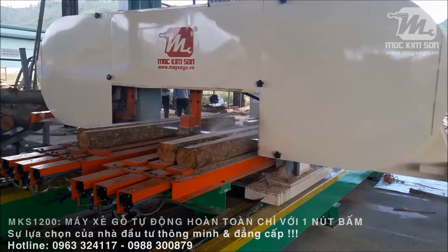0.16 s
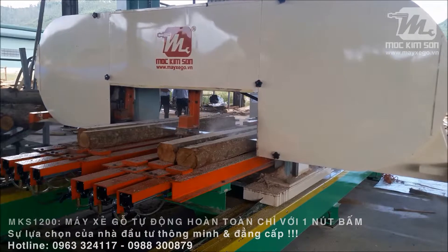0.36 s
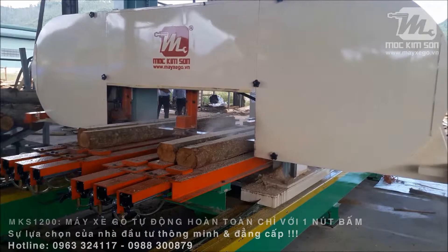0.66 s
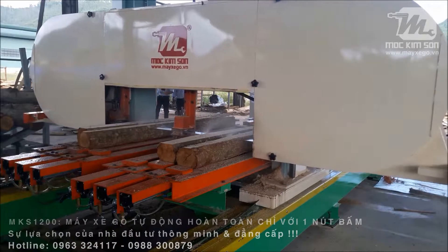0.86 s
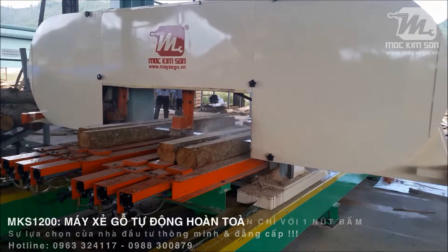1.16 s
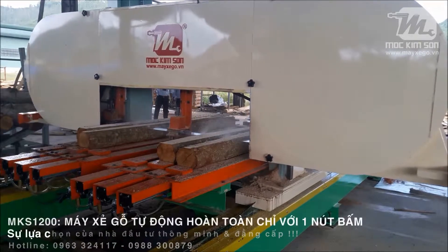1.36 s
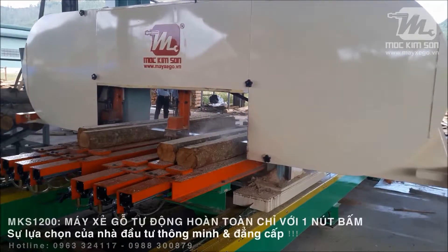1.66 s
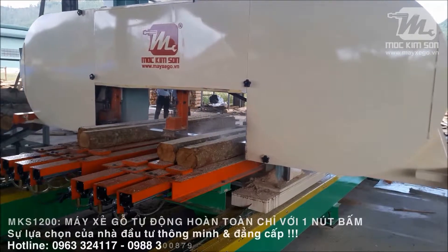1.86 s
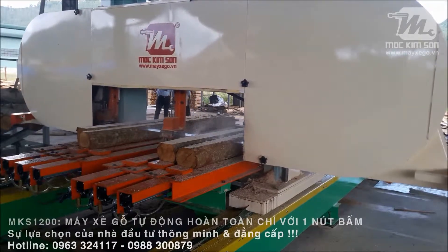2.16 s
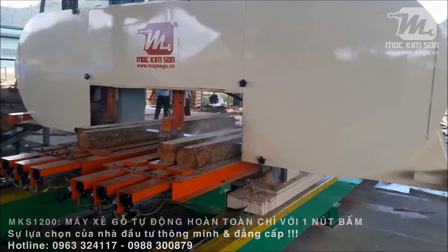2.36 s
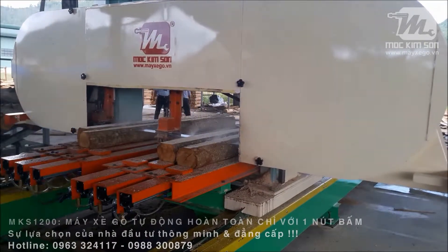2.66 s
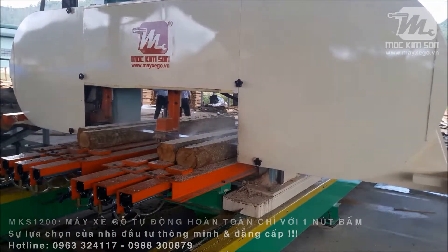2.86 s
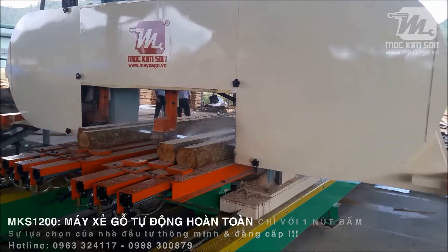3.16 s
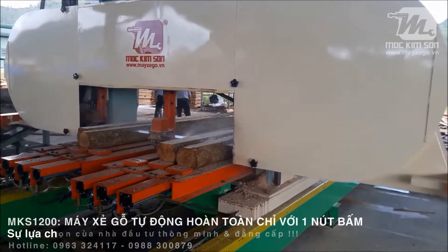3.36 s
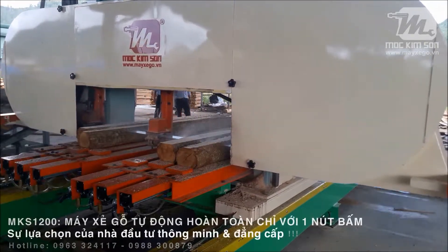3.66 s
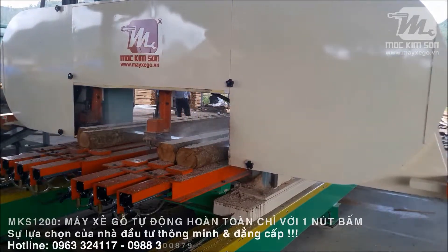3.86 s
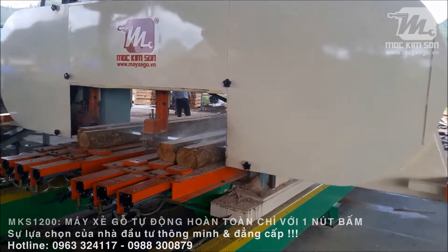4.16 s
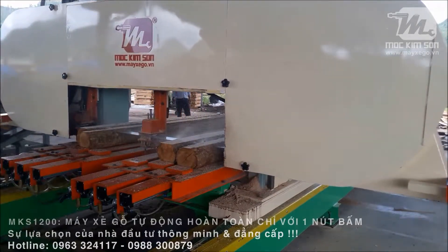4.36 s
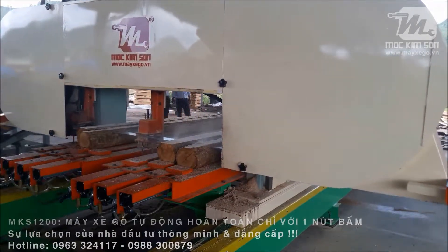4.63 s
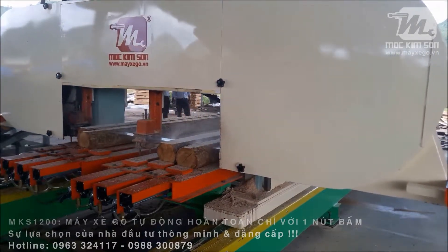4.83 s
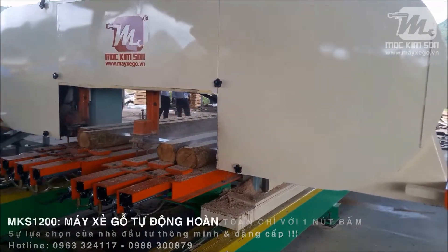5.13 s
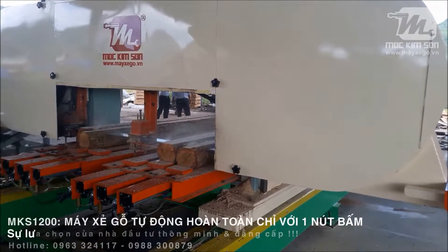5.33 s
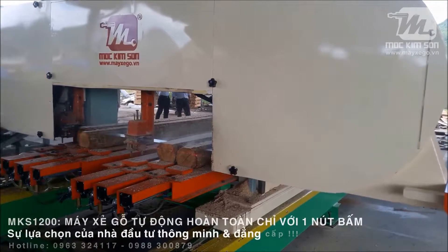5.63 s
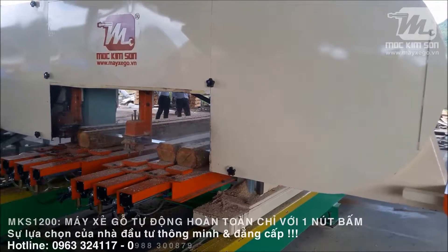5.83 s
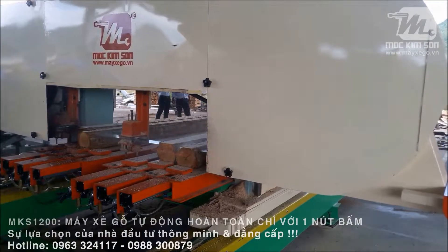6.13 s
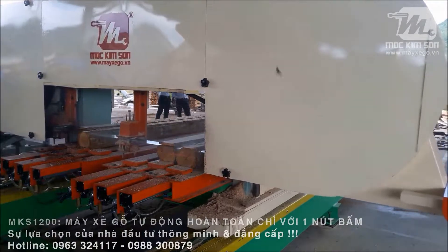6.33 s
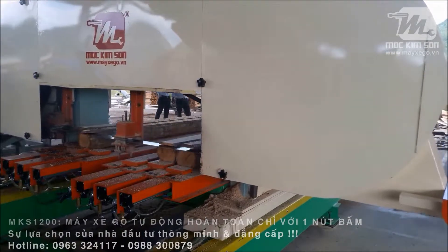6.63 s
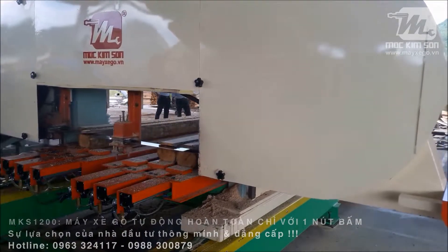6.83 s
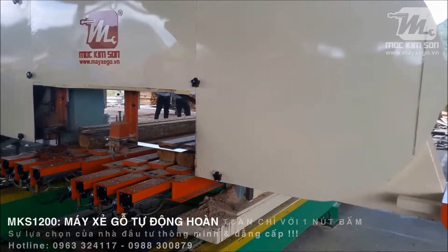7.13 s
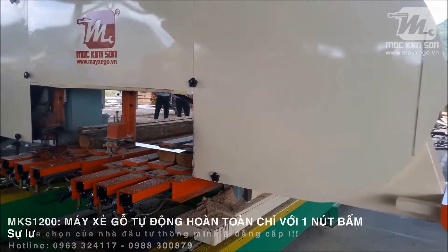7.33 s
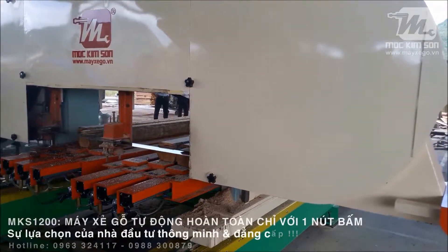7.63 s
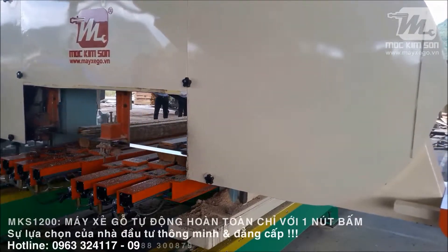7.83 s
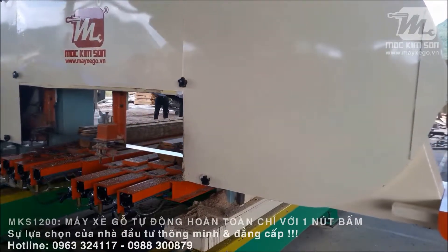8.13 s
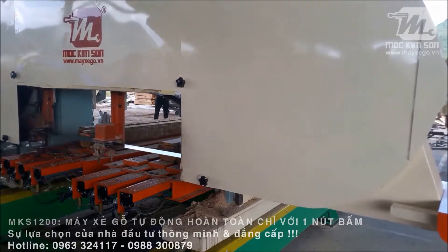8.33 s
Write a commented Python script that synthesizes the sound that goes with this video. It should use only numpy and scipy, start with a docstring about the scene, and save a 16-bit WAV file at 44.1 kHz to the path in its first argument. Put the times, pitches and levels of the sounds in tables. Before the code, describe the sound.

A band saw rasps and sings through logs over a steady machine roar, then its blade comes free and rings in throbs.

```python
"""A horizontal band saw cuts through two logs in an open shed and leaves the wood near the end.
Its teeth sing a wavering note and rasp in the kerf; once free, the undamped blade rings in throbs.
Underneath, wheels and motors roar and shake the taut blade like a stiff string, the frame rumbles,
gears and fans hum and a pump whines. The blade rubs its guides, and a slab scrapes as it shifts.
Heard by a small stereo microphone pair."""
import sys
import numpy as np
from scipy import signal
from scipy.io import wavfile
from scipy.ndimage import uniform_filter1d

SR = 44100
rng = np.random.default_rng(int(sys.argv[2]) if len(sys.argv) > 2 else 0)


def digitize_waveform(pressure):
    """Quantize a signal to 16-bit integers and store it at the path in sys.argv[1].

    Rows of a 2-D input are taken as channels; values are limited to [-1, 1].
    """
    field = np.atleast_2d(pressure).T
    bounded = np.clip(field, -1, 1)
    quanta = np.round(bounded * 32767).astype(np.int16)
    wavfile.write(sys.argv[1], SR, quanta)


N = 374409
T = np.arange(N) / SR

TOOTH_HZ, PUMP_HZ, BAND_LIMIT_HZ = 835.4, 455.2, 15735
BLADE_HZ, STIFFNESS = 37.05, 8.1e-5  # the blade as a string: stiffness stretches its overtones
NOTE_FADE_S, UPPER_FADE_S = (6.9, 7.5), (7.2, 6.6)  # the teeth leave the wood
SING_FLOOR_DB, THROB_HALF_S = -49.5, 0.026

# Stereo offset of the noises. Each row: time in seconds, lag of the right side in samples.
RIGHT_LAG = [(0, 4), (4, 5.15), (8.49, 6.9)]
# Stereo width of the noises. Each row: frequency in Hz, likeness of the two sides from 0 to 1.
STEREO_LIKENESS = [(60, 0.69), (400, 0.72), (1000, 0.63), (1800, 0.28), (2700, 0.17), (3600, 0.27),
                   (9800, 0.084), (10400, 0.18), (15500, 0.6)]
# Machine roar. Each row: time in seconds, level in dB.
ROAR_LEVEL = [(0, -34.5), (1.0, -33), (3.3, -33.5), (4.6, -33.5), (5.3, -35), (6.4, -31.5), (7.65, -34),
              (8.04, -31.5), (8.49, -32.5)]
# Broad colour of the roar. Each row: frequency in Hz, relative level in dB.
ROAR_COLOUR = [(25, -56.5), (60, -60), (100, -27), (190, -23.5), (250, -26), (320, -19.5), (500, -17),
               (780, -11.5), (850, -10.5), (1140, -8.5), (1600, -8.5), (2800, -4.5), (3700, -9.5),
               (5000, -11), (8000, -26), (15600, -32)]
# Casing resonances. Each row: centre in Hz, width in Hz, lift in dB.
CASING_MODES = [(305.4, 14, 7.5), (863, 59, 1.5), (2180, 310, 3.5), (2480, 170, -3.5), (2670, 93, 4)]
# Ring of the blade guard. Each row: time in seconds, level in dB.
GUARD_LEVEL = [(0, -49), (.4, -61), (1.0, -41), (1.5, -54.5), (2.9, -44), (3.5, -49), (4.25, -43.5),
               (4.7, -46), (6.1, -49.5), (6.8, -44), (7.2, -46), (7.6, -47), (8.0, -42), (8.49, -39.5)]
# Gears, fans and loud blade modes. Each row: pitch in Hz, level in dB.
HUM_TONES = [(649.3, -56.5), (746, -57), (990, -56), (1152, -61), (1194, -57.5), (1446, -53), (1486, -53),
             (2062, -56)]
# A faint pulsing hum. Each row: time in seconds, level at mid-swing in dB.
PULSING_LEVEL = [(0, -65), (.5, -62), (1.1, -58), (1.6, -63), (2.1, -70), (8.49, -80)]
# Pump whine, growing as the saw head nears. Each row: time in seconds, level in dB.
WHINE_LEVEL = [(0, -63), (3, -60.5), (4.4, -58.5), (5, -56), (6.0, -55.5), (6.05, -54), (6.35, -54.5),
               (6.85, -57.5), (7.1, -54), (7.6, -52), (7.9, -52), (8.15, -53.5), (8.49, -54)]
# One loud blade mode. Each row: time in seconds, level in dB.
BLADE_MODE_LEVEL = [(0, -69), (3, -48), (4.1, -54), (4.3, -47), (4.55, -57), (4.75, -45), (5.0, -54),
                    (5.2, -43.5), (5.5, -51), (5.7, -46), (5.95, -42), (6.2, -46), (6.35, -41),
                    (6.6, -42.5), (6.8, -40.5), (7.0, -51), (7.6, -46), (8.0, -47), (8.49, -46)]
# A low drone. Each row: time in seconds, level in dB.
DRONE_LEVEL = [(0, -75), (5.1, -65), (5.35, -56), (5.5, -77), (5.85, -71), (5.93, -51), (6.2, -56),
               (6.4, -60), (7.2, -65), (7.35, -57), (7.5, -59), (8.49, -63)]
# Slab scrapes. Each row: start, rise and decay in seconds, peak level in dB, centre in Hz.
SLAB_SCRAPES = [(7.86, 0.068, 0.26, -32.5, 2500), (7.92, 0.023, 0.03, -32, 2640),
                (8.0, 0.014, 0.19, -36, 4600), (8.005, 0.018, 0.054, -29, 2230)]
# Blade guides. Each row: time in seconds, levels of the lower and the upper ring in dB.
GUIDE_LEVELS = [(0, -56, -55), (1.5, -56, -53), (2.2, -53, -52), (3.3, -52, -50), (4.3, -45, -47),
                (4.7, -47, -54), (5.0, -45, -46), (5.6, -63, -54), (6.3, -52, -54), (7, -51, -44.5),
                (8.49, -56, -48)]
# Throbs of the free blade. Each row: peak time in seconds, height of the swell in dB, pitch in Hz.
BLADE_THROBS = [(6.68, -46, 848), (6.8, -42, 862), (7.1, -45, 858), (7.17, -42, 840), (7.31, -37.5, 857),
                (7.48, -38, 860), (7.59, -53, 850), (7.77, -38, 857), (7.89, -43, 848), (8.0, -39, 855),
                (8.2, -45, 862), (8.31, -39, 838), (8.37, -43, 850), (8.48, -38, 855)]
# Rasp in the kerf. Each row: time in seconds, level in dB, trim of the fizz above 10 kHz in dB.
RASP_LEVELS = [(0, -31.5, -1.5), (1.5, -30, -1.5), (3.4, -30.5, -1.5), (4.5, -30, -2), (4.58, -32, 0),
               (4.66, -29.5, -2.5), (4.8, -29.5, -2.5), (6.4, -30.5, -1), (6.63, -30.5, -2.5),
               (6.69, -30, -9), (6.86, -32.5, -5.5), (7.25, -37, -2.5), (7.65, -37, -3), (7.9, -34.5, -3),
               (8.49, -35, -4)]
# Colour of the rasp. Each row: frequency in Hz, relative level in dB.
RASP_COLOUR = [(880, -86), (1500, -12), (1750, -11.5), (2570, -0.5), (3130, -2.5), (3420, -1.5), (3880, -5),
               (4240, -8), (4410, -9.5), (7930, -12), (9370, -8.5), (14400, -10), (15600, -10.5)]
# Fundamental of the tooth note. Each row: time in seconds, level in dB.
FUNDAMENTAL_LEVEL = [(0, -57), (.4, -62), (1.05, -51), (1.3, -50), (1.65, -51), (2.2, -49), (2.55, -46),
                     (2.8, -43), (3.2, -42), (3.45, -46), (3.52, -54), (3.7, -47), (3.85, -57), (4.7, -54),
                     (5.2, -53), (5.5, -49), (5.7, -43), (6.0, -47), (6.45, -45.5), (6.55, -64)]
# Overtones swelling as the head travels through the shed's standing waves.
# Each row: time in seconds, levels of harmonics 2, 3 and 4 in dB.
OVERTONE_LEVELS = [(0, -50, -46, -47), (.3, -48, -46, -48), (.6, -45.5, -47, -51), (1.0, -54, -46, -53),
                   (1.4, -63, -50, -46), (1.8, -48.5, -46, -46.5), (2.2, -48, -42.5, -45),
                   (2.5, -52, -51, -48), (2.8, -53, -48, -47), (3.2, -56, -50, -46), (3.6, -45, -46.5, -50),
                   (4.0, -55, -49, -48), (4.4, -49, -47, -53), (4.65, -48, -39, -47),
                   (4.85, -62, -55, -43.5), (5.2, -47, -43, -53), (5.5, -55, -51, -53),
                   (6.0, -44.5, -59, -54), (6.4, -53, -50, -53), (6.7, -50, -48, -57), (7.1, -49, -47, -46)]
# The squeal, harmonic 5. Each row: time in seconds, level in dB.
SQUEAL_LEVEL = [(0, -44), (.12, -56), (.28, -52), (.36, -43), (.45, -54), (.6, -47), (.66, -52), (.75, -47),
                (1.05, -44), (1.25, -48), (1.45, -47), (1.58, -42), (1.8, -43), (1.84, -54), (2.0, -56),
                (2.08, -45), (2.25, -55), (2.55, -56), (2.75, -48), (2.95, -58), (3.15, -51), (3.4, -58),
                (4.4, -56), (4.6, -45), (4.8, -45), (4.95, -52), (5.25, -51), (5.6, -56), (7.1, -58)]
# Sputter of the tooth note. Each row: harmonic number, waver depth, top waver rate in Hz.
HARMONIC_WAVER = [(1, .18, 14), (2, .28, 18), (3, .33, 30), (4, .36, 40), (5, .55, 70)]
# Thin top of the tooth note. Each row: harmonic number, level relative to the bite in dB.
UPPER_HARMONICS = [(6, -55), (7, -59.5), (8, -60), (9, -56.5), (10, -55.5), (11, -51.5), (12, -54),
                   (14, -62)]


def gain_of(db):
    """Decibels to amplitude."""
    return 10 ** (np.asarray(db) / 20)


def unit_rms(x):
    """Scales to rms 1."""
    return x / np.sqrt(np.mean(x ** 2) + 1e-20)


def spectrum_at(points, hz):
    """Reads a spectrum on a log-frequency axis."""
    f, value = np.transpose(points)
    return np.interp(np.log(hz + 1), np.log(f + 1), value)


def curves(rows, t=T):
    """One automation curve for each column after the time."""
    times, *columns = np.transpose(rows)
    return np.array([np.interp(t, times, column) for column in columns])


def wander(top_hz, count=1):
    """Random curves of rms 1 that move at rates up to top_hz."""
    t = np.arange(0, N / SR + .01, .005)
    turns = rng.random((count, 30, 1)) + np.geomspace(top_hz / 15, top_hz, 30)[:, None] * t
    return np.array([np.interp(T, t, unit_rms(np.sin(2 * np.pi * p).sum(0))) for p in turns])


def resonance(hz, centre_hz, width_hz):
    """Power shape of one resonance, top 1."""
    return 1 / (1 + (2 * (hz - centre_hz) / width_hz) ** 2)


def noise(colour_db, size, patchy_db, patch_hz, patch_s):
    """Coloured stereo noise with drifting patches; below 10 kHz the shared part lags on the right."""
    hop = size // 4
    hz, t = np.fft.rfftfreq(size, 1 / SR), np.arange(N // hop + 5) * hop / SR
    a, b, c, d, patches = rng.standard_normal((len(t), len(hz), 5)).T
    left, apart = a + 1j * b, c + 1j * d
    bins, frames = max(int(patch_hz * size / SR), 1), max(int(patch_s * SR / hop), 1)
    patches = unit_rms(uniform_filter1d(uniform_filter1d(patches, bins, 0), frames, 1))
    likeness = np.clip(spectrum_at(STEREO_LIKENESS, hz), 0, 1)[:, None]
    delay = np.exp(-2j * np.pi * np.outer(hz * (hz < 10000), curves(RIGHT_LAG, t)[0]) / SR)
    right = likeness * delay * left + np.sqrt(1 - likeness ** 2) * apart
    spectra = np.array([left, right]) * gain_of(colour_db(hz)[:, None] + patchy_db * patches)
    return unit_rms(signal.istft(spectra, nperseg=size, noverlap=size - hop)[1][:, :N])


def tone(turns, waver, waver_hz):
    """A tone whose reflections make level and phase drift, partly apart on the two sides."""
    a, b, c, d, e, f = wander(waver_hz, count=6)
    drift = 1 + waver * (a + 1j * b + .9 * np.array([c + 1j * d, e + 1j * f]))
    return unit_rms((drift * np.exp(2j * np.pi * turns)).real)


def band_pulse():
    """A swing of height 1: the weld and set of the band pass about four times a second."""
    return np.cos(2 * np.pi * 4.08 * T - 2.64)


def rumble():
    """Lumpy low shaking of the frame, stronger as the head comes nearer."""
    lumps = noise(lambda hz: 30 * np.log10(resonance(hz, 178, 156)),
                  size=2048, patchy_db=3.5, patch_hz=120, patch_s=.06)
    return gain_of(np.interp(T, [6.4, 7.1], [-63, -59]) + 1.5 * wander(12)) * lumps


def roar():
    """Wheels and motors shake the blade: noise ringing at stiff-string, casing and guard modes."""
    n = np.arange(6, 62)
    modes_hz = BLADE_HZ * n * np.sqrt(1 + STIFFNESS * n ** 2)

    def body_colour(hz):
        rings = sum(resonance(hz, f, 5 + 0.015 * f) * np.exp(-(f / 1700) ** 4) for f in modes_hz)
        casing_db = sum(db * resonance(hz, f, width) for f, width, db in CASING_MODES)
        return spectrum_at(ROAR_COLOUR, hz) + casing_db + 10 * np.log10(1 + 4 * rings)

    def guard_colour(hz):
        rings = sum(resonance(hz, f, 27) for f in modes_hz)
        return 10 * np.log10((0.2 + rings) * resonance(hz, 935, 190) ** 3)

    body = noise(body_colour, size=4096, patchy_db=2.5, patch_hz=40, patch_s=.12)
    guard = noise(guard_colour, size=4096, patchy_db=2.5, patch_hz=30, patch_s=.1)
    body *= gain_of(curves(ROAR_LEVEL) + 0.75 * wander(9))
    guard *= gain_of(curves(GUARD_LEVEL) + 2 * wander(6))
    return body + guard


def hums():
    """A bed of slowly swelling tones, a rough panel ring and a hum that pulses with the band."""
    bed = sum(gain_of(db + 0.8 * wander(1.165)) * tone(hz * T, 0.92, 6) for hz, db in HUM_TONES)
    panel = gain_of(np.interp(T, [3, 7], [-52, -47])) * tone(1855 * T, 3, 40)
    pulsing = gain_of(curves(PULSING_LEVEL) - 6.7 * band_pulse()) * tone(411 * T, 0.22, 8)
    return bed + panel + pulsing


def pump_and_drones():
    """The pump's whine and octave, beside a blade mode and a drone that grow as the head nears."""
    whine = gain_of(curves(WHINE_LEVEL)) * tone(PUMP_HZ * T, 0.2, 8)
    octave = gain_of(np.interp(T, [0, 6.5, 7.1], [-56, -51, -57])) * tone(2 * PUMP_HZ * T, 0.2, 9.5)
    blade_mode = gain_of(curves(BLADE_MODE_LEVEL)) * tone(1362 * T, 1, 20)
    drone = gain_of(curves(DRONE_LEVEL)) * tone(334 * T, 0.25, 9.6)
    return whine + octave + blade_mode + drone


def scrapes():
    """Short gritty swells of wood sliding on steel."""
    out = 0
    for start, rise, decay, db, centre in SLAB_SCRAPES:
        grit = noise(lambda hz: 30 * np.log10(resonance(hz, centre, 0.8 * centre) * hz / centre + 1e-9),
                     size=256, patchy_db=2, patch_hz=1500, patch_s=0.008)
        envelope = np.clip((T - start) / rise, 0, 1) * np.exp(-np.maximum(T - start - rise, 0) / decay)
        out += gain_of(db) * envelope * grit
    return out


def guides():
    """Two rough rings that come and go as the blade rubs its guides."""
    lower_db, upper_db = curves(GUIDE_LEVELS)
    return gain_of(lower_db) * tone(2330 * T, 4.1, 45) + gain_of(upper_db) * tone(2900 * T, 2, 70)


def free_blade():
    """Out of the wood nothing damps the blade: a narrow ring, each throb at its own pitch."""
    times, _, pitches = np.transpose(BLADE_THROBS)
    ring = tone(np.cumsum(np.interp(T, times, pitches)) / SR, 0.2, 30)
    throbs = sum(gain_of(db) * np.exp(-((T - at) / THROB_HALF_S) ** 2) for at, db, _ in BLADE_THROBS)
    fade_in = np.interp(T, [6.3, 6.6], [0, 1])
    return (gain_of(SING_FLOOR_DB) + throbs) * ring * fade_in


def rasp():
    """Chips torn by every tooth: dense hiss that throbs with the band and flickers with the grain."""
    hiss = noise(lambda hz: spectrum_at(RASP_COLOUR, hz),
                 size=512, patchy_db=1, patch_hz=900, patch_s=0.035)
    coarse = signal.sosfiltfilt(signal.butter(6, 10000, fs=SR, output="sos"), hiss)
    fizz = hiss - coarse
    rasp_db, fizz_db = curves(RASP_LEVELS)
    flicker_db = 0.27 * band_pulse() + 0.5 * wander(30)
    return gain_of(rasp_db + flicker_db) * (coarse + gain_of(fizz_db) * fizz)


def teeth():
    """Harmonics of the tooth rate tremble under load and stop as the blade comes free, top first."""
    turns = np.cumsum(TOOTH_HZ * (1 + 0.000643 * wander(5)[0])) / SR
    levels_db = np.vstack([curves(FUNDAMENTAL_LEVEL), curves(OVERTONE_LEVELS), curves(SQUEAL_LEVEL)])
    note = sum(gain_of(db) * tone(k * turns, waver, waver_hz)
               for db, (k, waver, waver_hz) in zip(levels_db, HARMONIC_WAVER))
    # The thin top, smeared by the uneven set of the teeth, stands out as the head nears.
    bite_db = curves(RASP_LEVELS)[0] + np.interp(T, [2, 4.5], [26.5, 32])
    top = sum(gain_of(db + bite_db + 1.4 * wander(1.37)) * tone(k * turns, 4.5, 170)
              for k, db in UPPER_HARMONICS)
    # Around harmonic 3: a shaft wobble splits off a tone below, the blade rings roughly above.
    wobble = gain_of(levels_db[2] - 5) * tone(3 * turns - 21.5 * T, .5, 8)
    ring = gain_of(np.interp(T, [2.2, 5.5], [-47, -52])) * tone(2550 * T, 3, 70)
    body = (note + wobble + ring) * np.interp(T, NOTE_FADE_S, [1, 0])
    return body + top * np.interp(T, UPPER_FADE_S, [1, 0])


def scene():
    """The mix: machine bed, saw blade and the smaller sounds around them."""
    bed = roar() + rumble()
    saw = rasp() + teeth() + guides() + free_blade()
    return bed + saw + pump_and_drones() + hums() + scrapes()


def record(dry):
    """The small capsules lose the deep bass; a steep low-pass trims the very top."""
    thin = signal.sosfilt(signal.butter(2, 60, "high", fs=SR, output="sos"), dry)
    low_pass = signal.firwin(4095, BAND_LIMIT_HZ, window=("kaiser", 9), fs=SR)
    return signal.oaconvolve(thin, low_pass[None], "same")


dry = scene()
out = record(dry)
digitize_waveform(out)
```